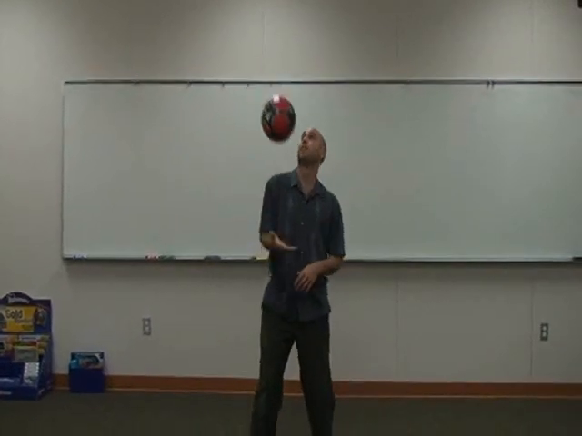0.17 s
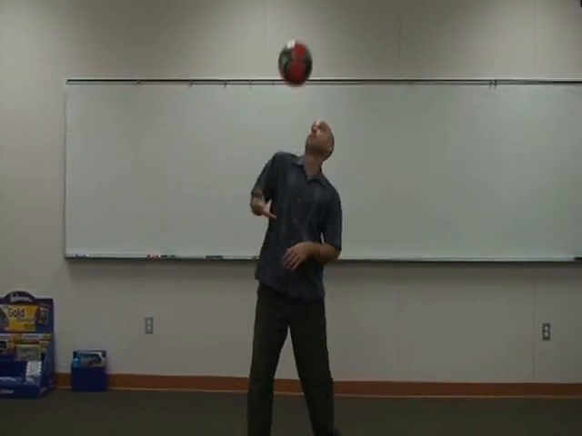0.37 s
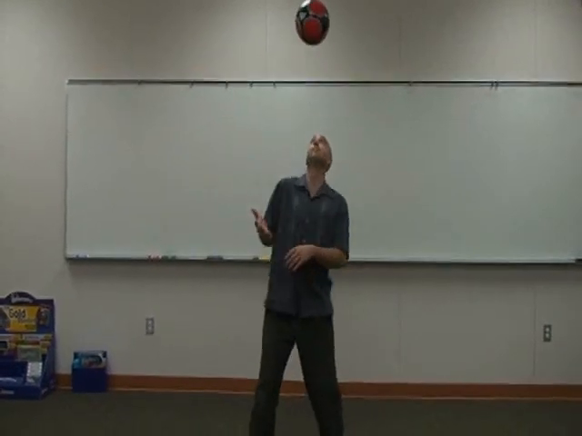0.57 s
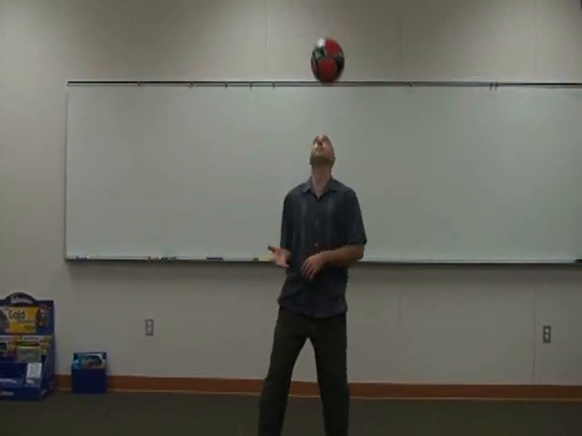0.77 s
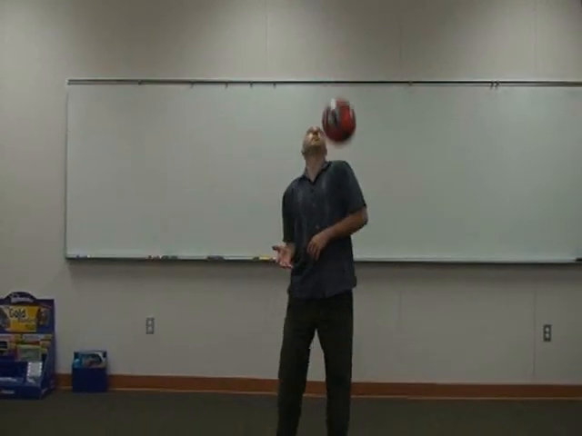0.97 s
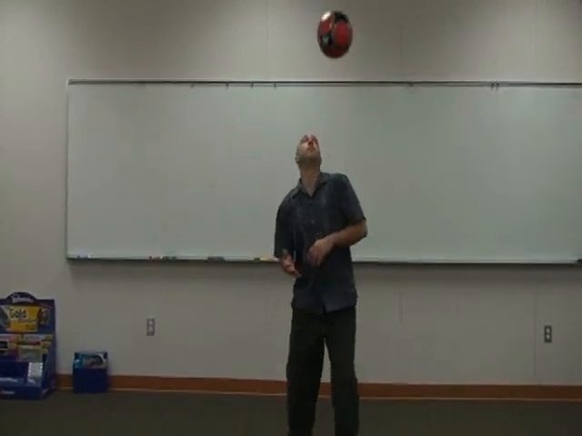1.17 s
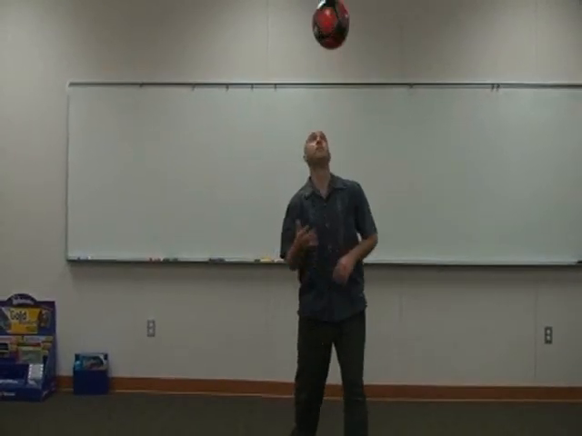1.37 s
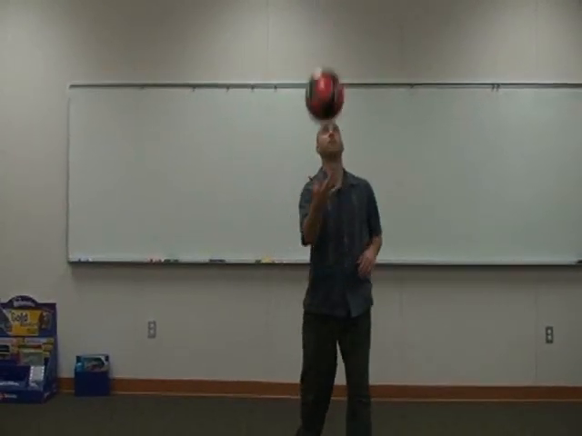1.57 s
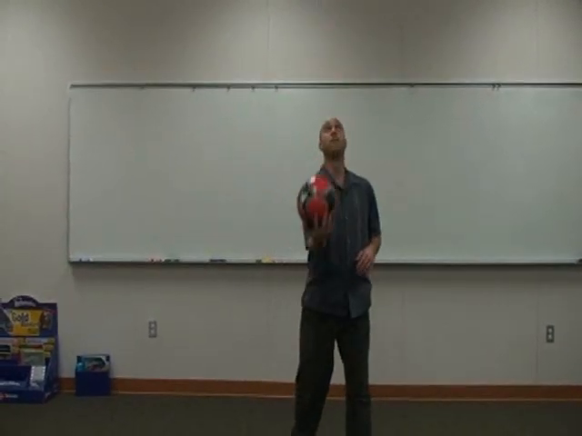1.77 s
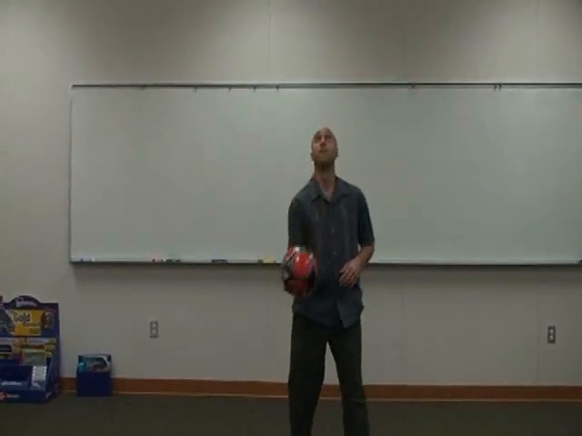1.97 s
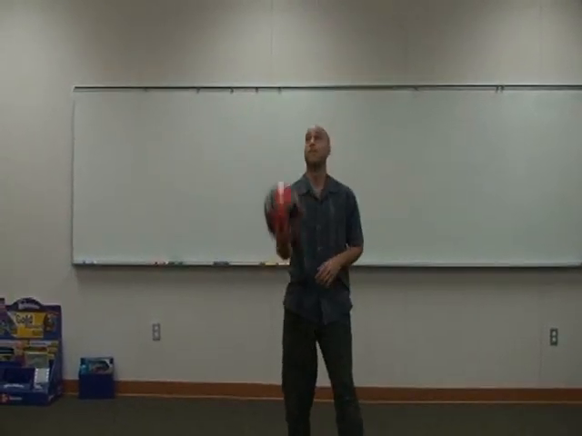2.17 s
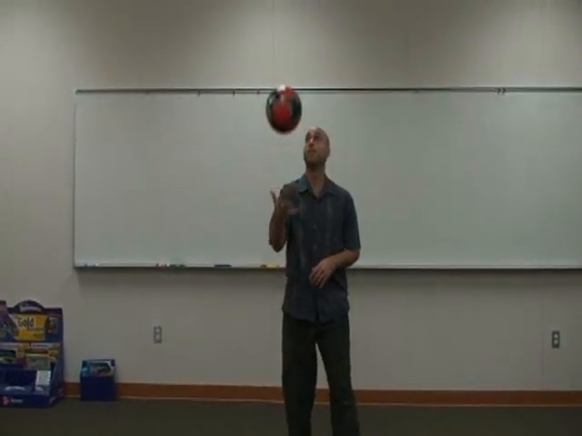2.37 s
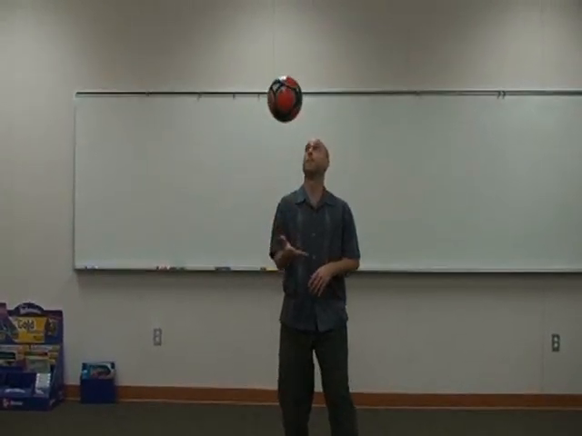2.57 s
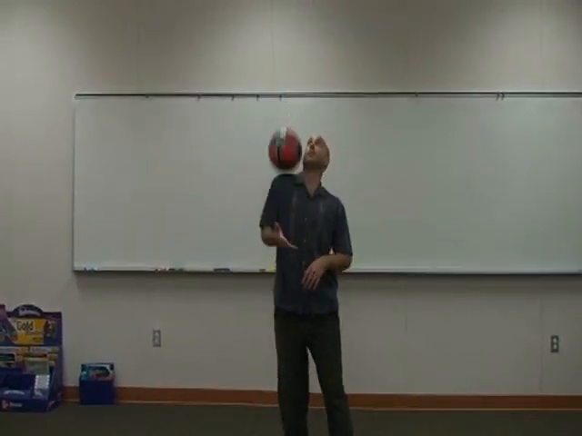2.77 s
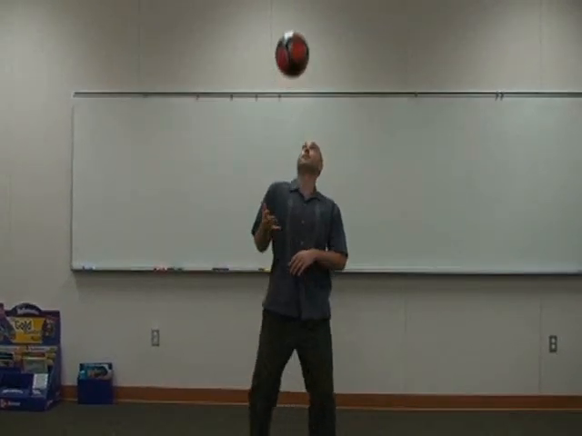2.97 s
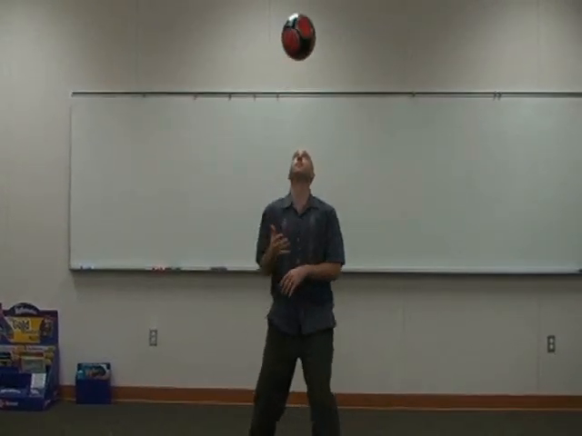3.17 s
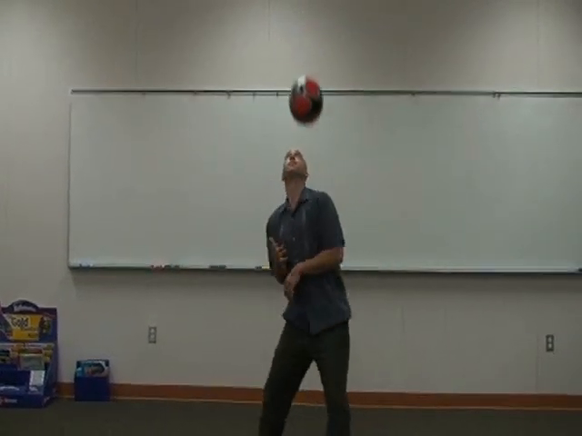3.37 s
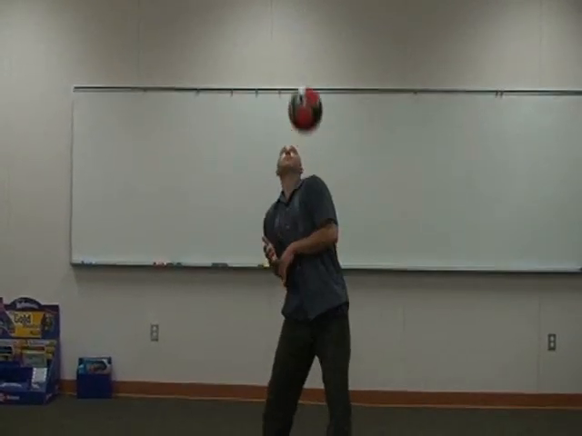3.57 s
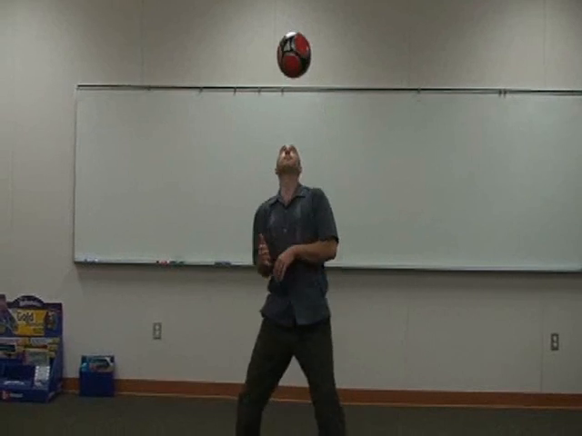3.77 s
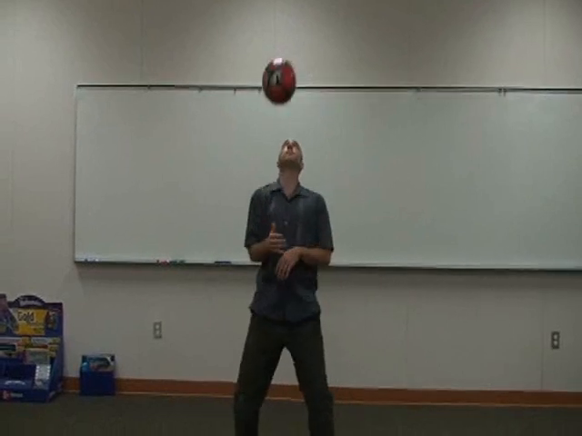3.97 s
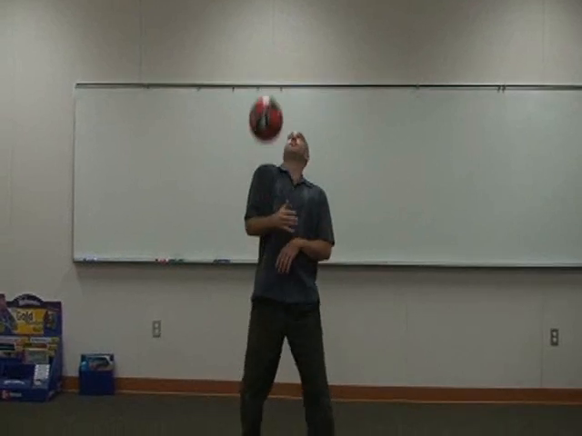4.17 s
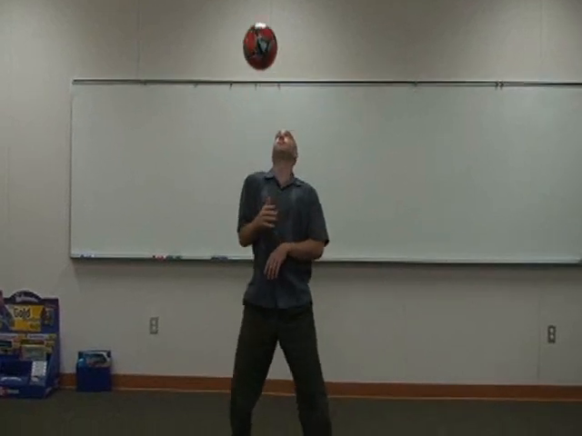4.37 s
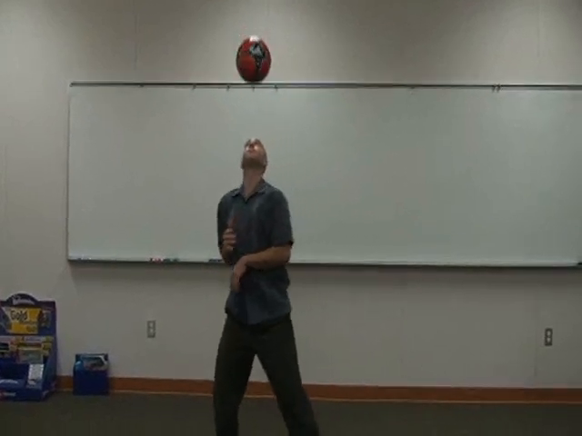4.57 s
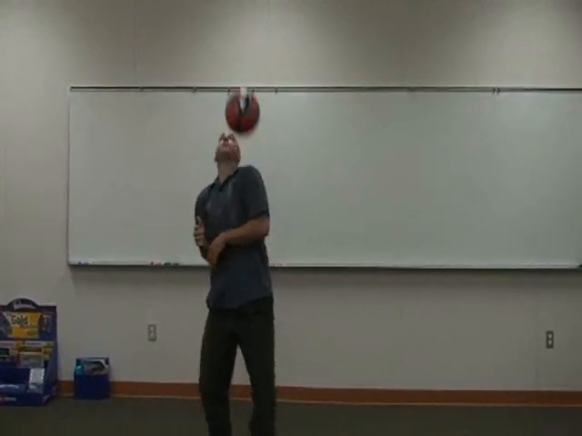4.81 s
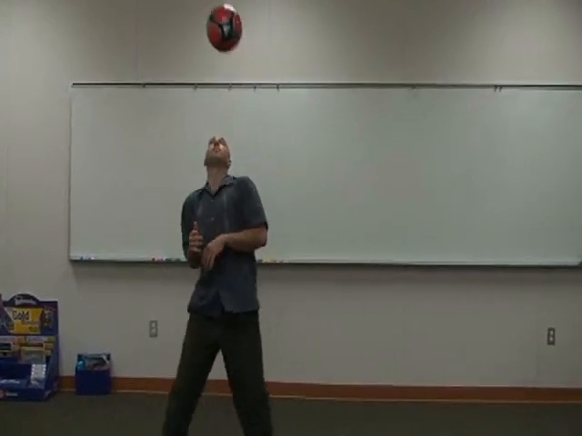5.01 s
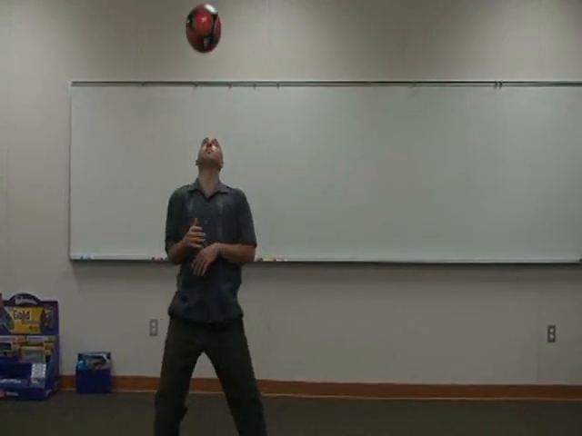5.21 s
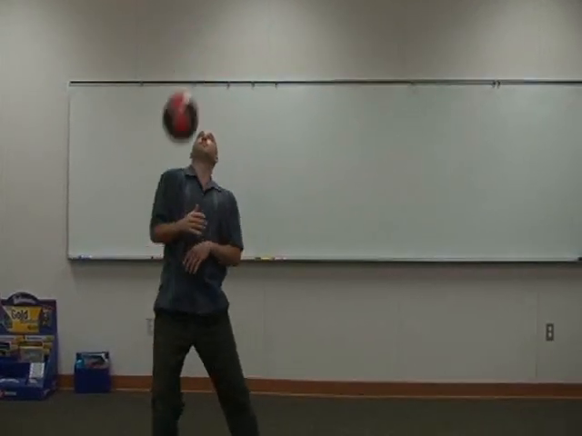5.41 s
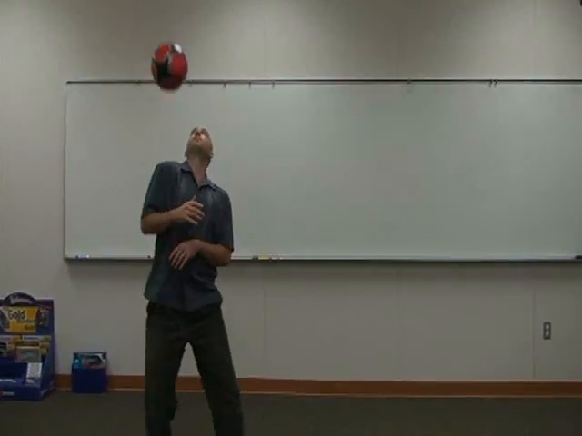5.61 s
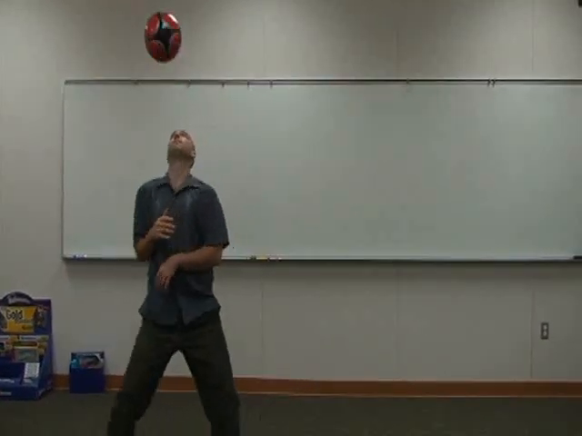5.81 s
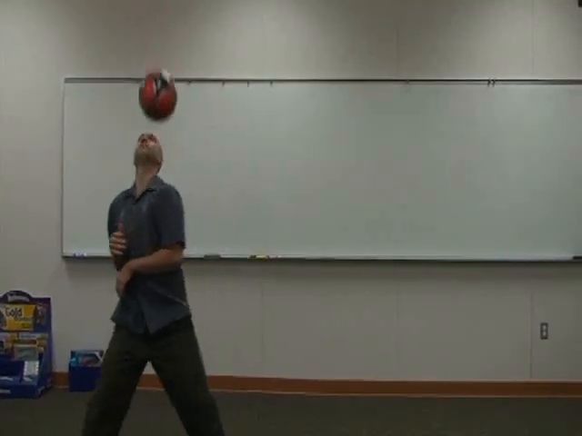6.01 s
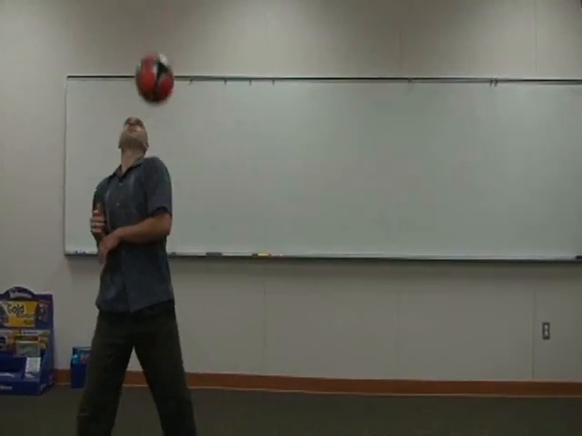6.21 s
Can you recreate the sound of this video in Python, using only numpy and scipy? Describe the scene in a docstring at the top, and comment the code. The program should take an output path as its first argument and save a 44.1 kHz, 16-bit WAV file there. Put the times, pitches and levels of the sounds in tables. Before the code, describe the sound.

Dull, springy ball bounces, each a low thump with a brief hollow ring and slappy edge, repeat roughly every two thirds of a second, broken once by a quick fingers-then-palm catch. Hard walls return close echoes and a short diffuse tail. Muffled steps on carpet and slight sleeve swishes accompany them over constant duct rumble and hiss, heard from a distance, bass mostly on the right.

```python
"""A carpeted classroom: a juggler tosses an inflated ball from shoulder to shoulder and catches it once by hand.
Each bounce sums damped modes (low thump, knock, short hollow ring) and a noise slap of the skin.
Floor, whiteboard and room answer with early echoes and a diffuse noise tail.
Swelling noise makes the scuffs of shoes and clothes; steady noise and two sines make the ventilation.
The left microphone is weak and has little bass."""
import sys
import numpy as np
from scipy import signal
from scipy.fft import rfft, irfft, next_fast_len
from scipy.io import wavfile
from scipy.ndimage import uniform_filter1d, minimum_filter1d, map_coordinates

SR = 44100
rng = np.random.default_rng(int(sys.argv[2]) if len(sys.argv) > 2 else 0)


def output_pcm(signal):
    """Save a mono or channel-first signal as 16-bit PCM at the path in sys.argv[1].

    Samples are clipped to [-1, 1] before scaling.
    """
    pcm = np.clip(np.atleast_2d(signal).T, -1, 1) * 32767
    wavfile.write(sys.argv[1], SR, np.round(pcm).astype(np.int16))


N = 275622


def amp(db):
    """Decibels to amplitude."""
    return 10 ** (np.asarray(db) / 20)


def unit(x):
    """Scale to rms 1."""
    return x / np.sqrt(np.mean(x ** 2) + 1e-20)


def along(points, hz):
    """Interpolate (Hz, value) points on a log frequency axis."""
    point_hz, values = np.transpose(points)
    return np.interp(np.log(hz + 1), np.log(point_hz), values)


def filtered(x, response):
    """Multiply the spectrum of x by a response of frequency."""
    n = x.shape[-1]
    padded = next_fast_len(n + SR // 4)
    hz = np.fft.rfftfreq(padded, 1 / SR)
    return irfft(rfft(x, padded) * response(hz), padded)[..., :n]


def noise(spectrum, size):
    """Coloured noise of rms 1."""
    white = rng.standard_normal(size)
    return unit(filtered(white, lambda hz: amp(along(spectrum, hz))))


def wobble(knots_per_s):
    """Smooth random curve through random knots."""
    knots = rng.standard_normal(int(N * knots_per_s / SR) + 4)
    return map_coordinates(knots, [np.arange(N) * knots_per_s / SR])


def add(track, start_s, x):
    """Mix x into the track from start_s."""
    part = track[:, round(start_s * SR):][:, :x.shape[-1]]
    part += x[..., :part.shape[-1]]


# Ball on a shoulder. Each row: start in seconds, strength in dB, ring over the blow in dB,
# overtones over the blow in dB, pitch ratio of ring and overtones, slap band centre in Hz,
# height of that band in dB, slap t60 in seconds.
BOUNCES = [(0.2276, -27.5, -5, 0, 1.02, 4780, 11.5, 0.02), (0.9282, -22.5, 0, -1, 1.074, 3410, 9.5, 0.03),
           (2.725, -28, 3, -1.5, 1.046, 8000, 4, 0.033),
           (3.4426, -22.5, -3.5, -13, 1.005, 2850, 4.5, 0.025),
           (4.0866, -24, 0, -8.5, 1.005, 2600, 9, 0.025), (4.7381, -24, -2, -7.5, 1.09, 4330, 6, 0.027),
           (5.452, -23.5, -1, -9, .99, 3624, 7, 0.044), (6.097, -22.5, 0.5, -23, 1.06, 3500, 7.5, 0.02)]
# The catch, fingers then palm. Each row: start in seconds, ring in dB, slap in dB.
CATCH = [(1.6276, -24.5, -21.5), (1.633, -19, -14)]
# Push of the body. Each row: mode in Hz, relative level in dB, t60 in seconds.
THUMP_MODES = [(68.4, 4.5, 0.038), (99, 3, 0.031)]
# Knock of the shell. Each row: mode in Hz, relative level in dB, t60 in seconds.
KNOCK_MODES = [(169, -6.5, 0.025), (251.7, -4.5, 0.033), (305.6, 4.5, 0.019), (387.3, -22, 0.05)]
# Hollow ring of the air inside. Each row: mode in Hz before the pitch ratio, relative level in dB, t60 in seconds.
RING_MODES = [(775, -2, .05), (850, 1, .05), (950, -3, .04)]
# Higher flexing of the shell. Each row: mode in Hz before the pitch ratio, relative level in dB, t60 in seconds.
OVERTONE_MODES = [(1206, -1.5, 0.05), (1437, -9.5, 0.042)]
# Ball ringing freely in the hand. Each row: mode in Hz, relative level in dB, t60 in seconds.
HELD_MODES = [(192, 1, 0.039), (317, -9.5, 0.06), (735, -5, 0.024), (1015, -1.5, 0.056), (1810, -18, 0.039),
              (2510, -3.5, 0.018), (2686, -10.5, 0.05)]


def ball():
    """One strength drives thump, knock, ring and slap of a bounce; the catch leaves the air inside ringing."""
    out = np.zeros((2, N))
    t = np.arange(SR // 4) / SR
    thump_db, knock_db = 1.5, -1  # over the strength of the blow
    # the knock has the opposite polarity
    body = amp(thump_db) * ring(THUMP_MODES, t) - amp(knock_db) * ring(KNOCK_MODES, t)
    for start_s, strength_db, ring_db, overtone_db, ratio, centre_hz, peak_db, t60_s in BOUNCES:
        hollow = amp(ring_db) * ring(RING_MODES, t, ratio)
        overtones = amp(overtone_db) * ring(OVERTONE_MODES, t, ratio)
        blow = body + hollow + overtones + slap(t, centre_hz, peak_db, t60_s)
        add(out, start_s, room(amp(strength_db) * blow, gap_s=0.01, build_s=0.005, wet_db=1.0))
    for start_s, ring_db, slap_db in CATCH:
        held = amp(ring_db) * ring(HELD_MODES, t)
        skin = amp(slap_db) * slap(t, centre_hz=3500, peak_db=4.5, t60_s=0.0081, snap_db=-18.0)
        add(out, start_s, room(held + skin, gap_s=0.004, build_s=0.0045, wet_db=-1.0))
    return out


def ring(modes, t, ratio=1, contact_s=0.00071):
    """Damped modes build up during the contact; the skin is first pushed inward."""
    swing = sum(amp(db - 60 * t / t60_s) * np.sin(2 * np.pi * hz * ratio * t)
                for hz, db, t60_s in modes)
    return -swing * (1 - np.exp(-t / contact_s))


# Slap of the skin. Each row: frequency in Hz, relative density in dB.
SLAP_SPECTRUM = [(100, 11.5), (350, 2.5), (560, -4.5), (850, 11), (1300, 1), (1900, 0), (2600, 0),
                 (4200, -5), (7500, -7), (10000, -16.5), (12000, -9.5), (15500, -27)]


def slap(t, centre_hz, peak_db, t60_s, snap_db=2, snap_t60_s=0.0044):
    """The skin snaps onto the contact patch, then flattens: a noise burst, raised in the band the patch favours."""
    decay = amp(-60 * t / t60_s) + amp(snap_db - 60 * t / snap_t60_s)
    burst = rng.standard_normal(len(t)) * decay
    hz = np.fft.rfftfreq(len(t), 1 / SR)
    patch = np.exp(-(2 * np.log2((hz + 1) / centre_hz)) ** 2)  # about an octave wide
    size = amp(along(SLAP_SPECTRUM, hz) + peak_db * patch)
    phase = np.angle(rfft(burst))  # keeps the timing of the burst
    even = irfft(size * np.exp(1j * phase), len(t))
    first_half = t < t[-1] / 2  # drops what wraps round
    return unit(even * first_half) * np.std(burst)


# Footfalls as the juggler shifts under the ball.
# Each row: centre in seconds, weight in dB, scrape of the sole in dB.
STEPS = [(0.553, -44.5, -64), (1.29, -49.5, -51), (2.943, -42, -46), (3.15, -38, -49.5),
         (3.681, -38, -47.5), (4.99, -49.5, -51.5), (5.637, -43, -43)]
# Swings of an arm in its sleeve. Each row: centre in seconds, half length in seconds, level in dB.
SWINGS = [(1.852, 0.018, -55), (2.202, 0.05, -51), (2.786, 0.063, -46), (3.919, 0.017, -45.5),
          (4.32, 0.057, -52), (4.694, 0.05, -49.5)]
# Footfall on carpet. Each row: frequency in Hz, relative density in dB.
FOOTFALL_SPECTRUM = [(40, -45), (80, -3), (190, 6), (290, -4.5), (500, -15), (900, -12), (1500, -28),
                     (3000, -37)]
# Rubbing cloth and soles. Each row: frequency in Hz, relative density in dB.
CLOTH_SPECTRUM = [(200, 2), (700, 0), (1700, 1), (4000, -9), (8000, -13), (10000, -22.5), (12000, -16),
                  (16000, -35)]


def scuffs():
    """Soft steps on carpet and swishes of the shirt: noise that swells and fades evenly."""
    t = np.arange(N) / SR
    step_half_s = 0.02

    def swell(centre_s, half_s):
        """Bell-shaped envelope."""
        return np.exp(-((t - centre_s) / half_s) ** 2)

    feet = sum(amp(weight_db) * swell(s, step_half_s) for s, weight_db, _ in STEPS)
    soles = sum(amp(scrape_db) * swell(s, step_half_s) for s, _, scrape_db in STEPS)
    sleeves = sum(amp(db) * swell(s, half_s) for s, half_s, db in SWINGS)
    dry_scuffs = feet * noise(FOOTFALL_SPECTRUM, N) + (soles + sleeves) * noise(CLOTH_SPECTRUM, N)
    return room(dry_scuffs, gap_s=0.0087, build_s=0.0025, wet_db=2.5)[:, :N]


# Ventilation and microphone hiss. Each row: frequency in Hz, left and right relative density in dB.
AIR_SPECTRUM = [(18, -28, -6.5), (40.5, -30, 0), (68.6, -21, -3), (107, -30, 0.5), (175, -27, -9.5),
                (270, -22.5, -17.5), (590, -23, -24.5), (1250, -26, -27), (2530, -32.5, -35),
                (5300, -40, -40), (10500, -47, -45.5), (12700, -53.5, -43), (16100, -63, -50)]
# Fan shaft and motor. Each row: frequency in Hz, rms level in dB at the right microphone.
HUM_LINES = [(29.3, -43), (119.6, -39.5)]


def ventilation(air_db=-42.5, drift_rad=0.031, hum_left_db=-25):
    """Duct rumble and hiss under fan lines whose phase drifts slightly."""
    t = np.arange(N) / SR
    air = np.array(AIR_SPECTRUM)
    separate, common = rng.standard_normal((2, N)), rng.standard_normal(N)

    def shared(hz):
        """Share of the noise power common to both microphones."""
        return np.clip(along([(80, 1.0), (300, 0.31), (8000, 0.33)], hz), 0, 1)

    flow = filtered(separate, lambda hz: np.sqrt(1 - shared(hz)))
    flow = flow + filtered(common, lambda hz: np.sqrt(shared(hz)))
    flow = filtered(flow, lambda hz: amp([along(air[:, [0, 1]], hz), along(air[:, [0, 2]], hz)]))
    hum = sum(amp(db) * np.sqrt(2) * np.sin(2 * np.pi * hz * t + drift_rad * wobble(3.32))
              for hz, db in HUM_LINES)
    return amp(air_db) * unit(flow) + hum * amp([[hum_left_db], [0]])


# Early echoes. Each row: mean delay in seconds, gain.
WALLS = [(.0017, .3), (.0036, .45), (.0105, .6), (.0122, .35), (.0143, .3), (.0185, .25), (.027, .2)]
# Decay of the tail. Each row: frequency in Hz, t60 in seconds.
ROOM_T60 = [(70, 0.77), (170, 0.41), (400, 0.72), (1000, 0.4), (3000, 0.64), (7000, 0.69), (13000, 0.43)]
# Colour of the tail. Each row: frequency in Hz, relative level in dB.
ROOM_COLOUR = [(60, -1.5), (150, 4.5), (300, 9), (560, 7.5), (850, 6.5), (3000, 0), (12000, 0.5)]
# Left-right likeness of the tail. Each row: frequency in Hz, correlation from 0 to 1.
ALIKE = [(100, 1), (500, 0.54), (1500, 0.4), (5000, 0.18), (13000, 0.2)]


def room(x, gap_s, build_s, wet_db):
    """Direct sound, early echoes and a fresh diffuse tail at both microphones."""
    hz, t, z = signal.stft(rng.standard_normal((2, SR * 3 // 4)), SR, nperseg=512)
    turn = np.arccos(np.clip(along(ALIKE, hz), 0, 1))[:, None] / 2
    mid, side = z[0] * np.cos(turn), z[1] * np.sin(turn)
    fade = amp(-60 * t / along(ROOM_T60, hz)[:, None])
    tail = signal.istft(np.array([mid + side, mid - side]) * fade, SR, nperseg=512)[1]
    tail = tail / np.linalg.norm(tail[0])
    tail = filtered(tail, lambda f: amp(along(ROOM_COLOUR, f)))
    since_gap_s = np.maximum(np.arange(tail.shape[1]) / SR - gap_s, 0)
    answer = amp(wet_db) * tail * (1 - np.exp(-since_gap_s / build_s))
    answer[:, 0] += 1  # direct sound
    for delay_s, gain in WALLS:
        path_ratio = rng.normal(1, 0.025)  # the paths shift as the juggler moves
        answer[:, round(delay_s * path_ratio * SR)] += gain
    return signal.fftconvolve(x[None], answer, axes=1)


# Left microphone's response to the juggler. Each row: frequency in Hz, gain in dB.
LEFT_RESPONSE = [(60, -31), (130, -20.5), (250, -19), (500, -13.5), (1000, -10), (4000, -9), (6500, -11.5),
                 (9000, -7), (12000, -7.5)]


def scene():
    """The juggler reaches the left microphone thin and weak; ventilation adds to both."""
    left, right = ball() + scuffs()
    left = filtered(left, lambda hz: amp(along(LEFT_RESPONSE, hz)))
    return np.array([left, right]) + ventilation()


def limiter(x, ceiling_db=-14.5, hold_s=0.0017):
    """The gain of both channels ducks for a few milliseconds around each peak that passes the ceiling."""
    peak = np.abs(x).max(axis=0)
    needed = np.minimum(1, amp(ceiling_db) / (peak + 1e-9))
    size = max(2, round(hold_s * SR))
    return x * uniform_filter1d(minimum_filter1d(needed, size), size)


def record(dry, low_cut_hz=22, top_hz=15700):
    """The camera limits the peaks, weakens the deepest rumble and keeps nothing above its band limit."""
    def response(hz):
        """First-order low cut under a sharp top."""
        return (hz < top_hz) * 1j * hz / (low_cut_hz + 1j * hz)

    return filtered(limiter(dry), response)


dry = scene()
out = record(dry)
output_pcm(out)
```